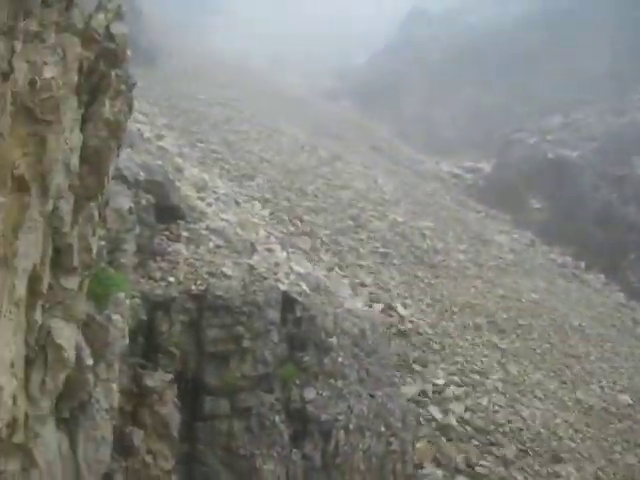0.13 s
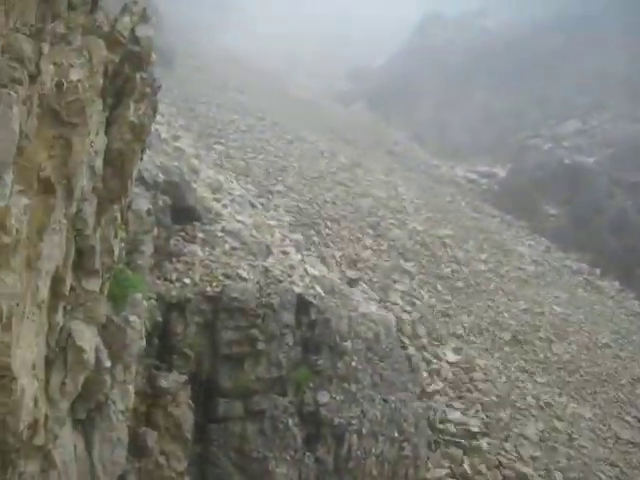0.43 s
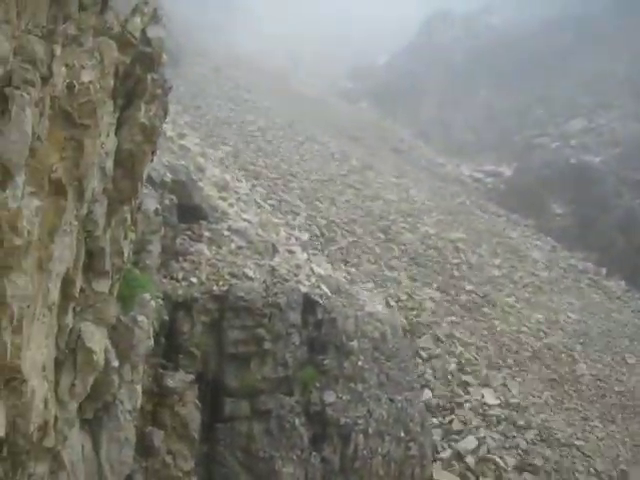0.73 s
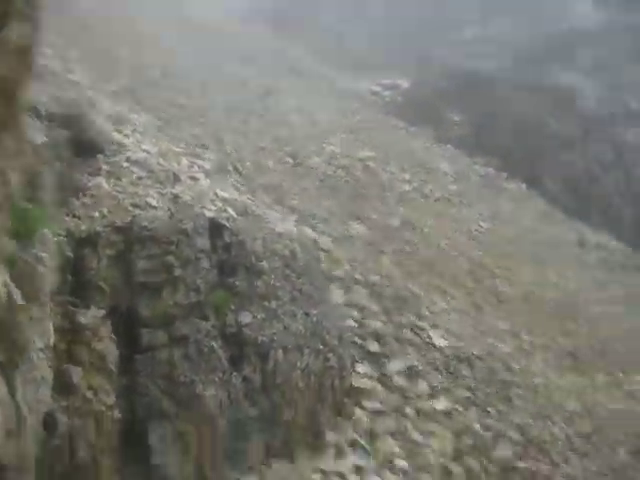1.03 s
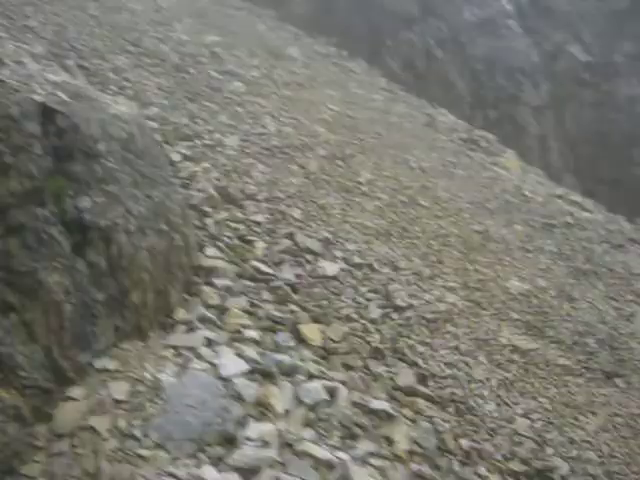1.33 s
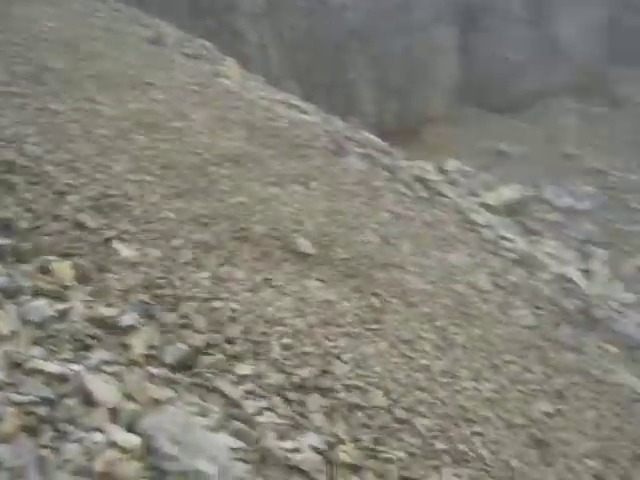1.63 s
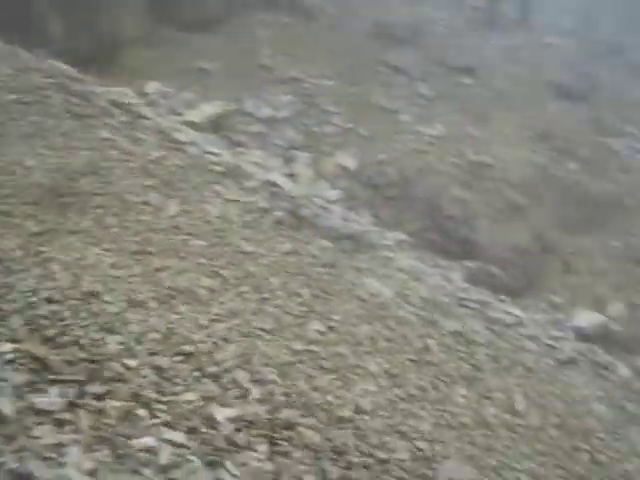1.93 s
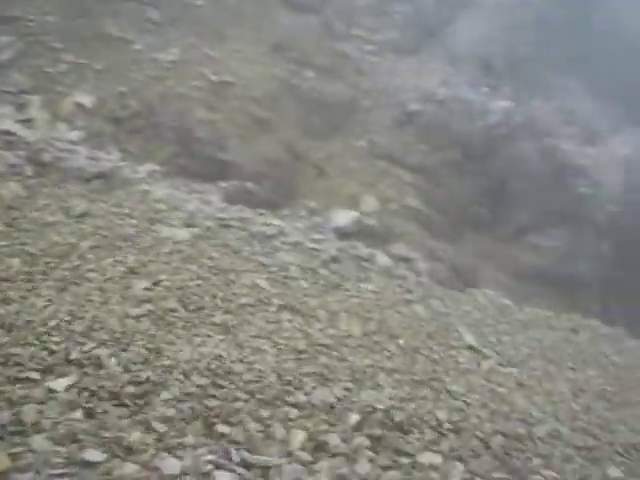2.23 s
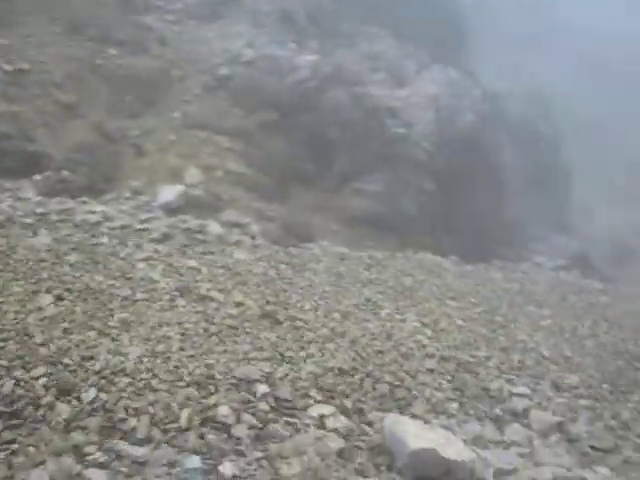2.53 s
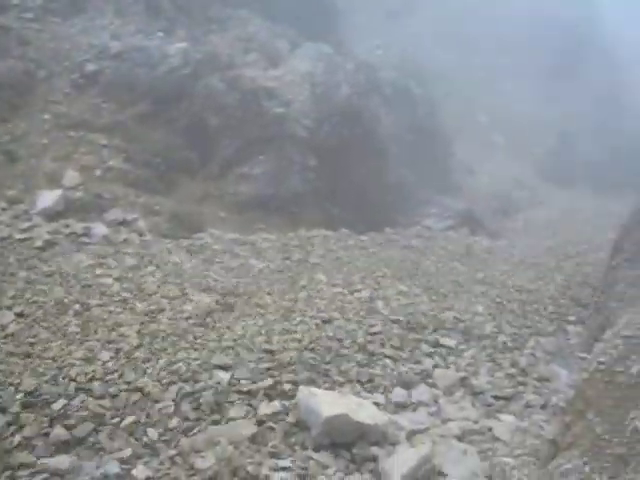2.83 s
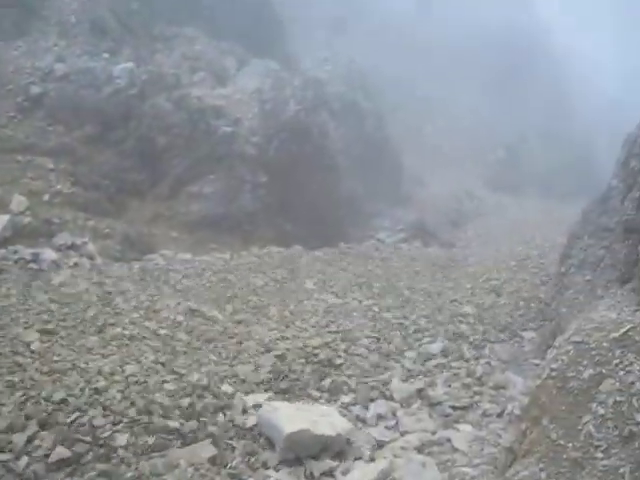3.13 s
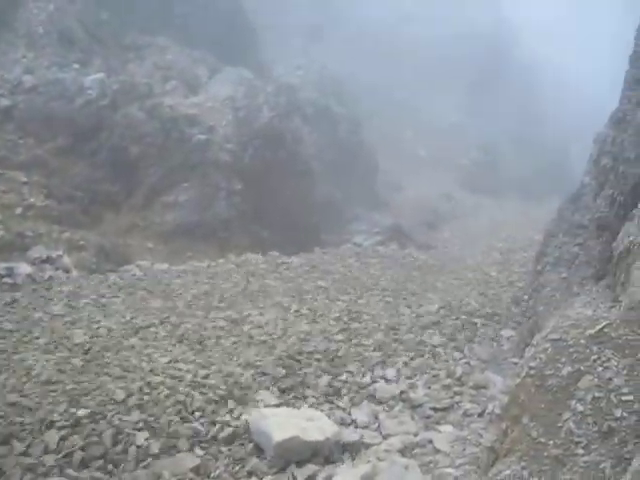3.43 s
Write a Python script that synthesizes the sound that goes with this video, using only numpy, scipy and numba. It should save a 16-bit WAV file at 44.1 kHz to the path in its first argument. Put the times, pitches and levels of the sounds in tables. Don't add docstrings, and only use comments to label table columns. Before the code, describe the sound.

Loose stones stream down a steep rock gully in a dense, dry, hissing rattle.

```python
import sys
import numpy as np
from scipy import signal
from scipy.fft import rfft, irfft
from scipy.io import wavfile
from scipy.ndimage import uniform_filter1d
from numba import njit

SR = 44100
rng = np.random.default_rng(int(sys.argv[2]) if len(sys.argv) > 2 else 0)


def materialize(psi):
    bounded = np.clip(np.atleast_2d(psi).T, -1, 1)
    quanta = np.round(bounded * 32767).astype(np.int16)
    wavfile.write(sys.argv[1], SR, quanta)


def amplitude_ratio(level_db):
    exponent = np.asarray(level_db, float) / 20
    return 10 ** exponent


N = 157437


def read(table, hz):
    table = np.array(table)
    return np.interp(np.log(hz), np.log(table[:, 0]), table[:, 1])


def unit(x):
    return x / np.sqrt(np.mean(x ** 2))


def walk(rate):
    hold = int(SR / rate)
    steps = np.repeat(rng.standard_normal(N // hold + 1), hold)
    slewed = uniform_filter1d(uniform_filter1d(steps, hold), hold)[:N]
    return unit(slewed - uniform_filter1d(slewed, size=SR // 3))


def band(x, lo_hz, hi_hz):
    hz = np.arange(N // 2 + 1) * SR / N
    inside_hz = np.minimum(hz - lo_hz, hi_hz - hz)
    return irfft(rfft(x) * np.clip(inside_hz / 40 + 1, 0, 1), N)


@njit
def rings(length, start, hz, cycles, size):
    out = np.zeros(length)
    for k in range(len(start)):
        turn = np.exp((2j * np.pi - np.log(1000) / cycles[k]) * hz[k] / SR)
        z = size[k] + 0j
        for i in range(start[k], min(length, start[k] + int(cycles[k] * SR / hz[k]))):
            out[i] += z.imag
            z *= turn
    return out


def struck(hits):
    s, db, hz, cycles = np.array(hits, float).T
    return -rings(N, (s * SR).astype(np.int64), hz, cycles, amplitude_ratio(db))


def stream(tilt_db):
    # [f/Hz, level/dB]
    stone_levels = [(330, -22.5), (500, -17.5), (1000, -14), (1600, -11), (2300, -2.5), (3500, -0.75),
                    (4800, 2.15), (6200, -4.5)]
    knocks_per_s, knock_cycles, knock_spread_db = 65000, 12, 1.5
    surges_per_s, surge_db = 36, .4
    patches_per_s, patch_db = 26, .65
    where, pitch, loudness, damping, sign = rng.random((int(knocks_per_s * N / SR), 5)).T
    at = (where * N).astype(np.int64)
    hz = 300 * 22 ** pitch
    patches = np.array([walk(patches_per_s) for _ in range(9)])
    group = (pitch * len(patches)).astype(int)
    db = read(stone_levels, hz) - knock_spread_db * np.log(loudness + 1e-9) + 10 * np.log10(hz)
    db = db + surge_db * walk(surges_per_s)[at] + patch_db * patches[group, at]
    db = db - tilt_db[at] * np.log2(hz / 3000)
    knocks = rings(N, at, hz, knock_cycles * (.5 + damping), amplitude_ratio(db) * np.sign(sign - .5))
    knocks = signal.lfilter(*signal.butter(1, 915, "high", fs=SR), knocks)
    return unit(signal.sosfilt(signal.butter(4, 338, "high", fs=SR, output="sos"), knocks))


def clacks():
    # [t/s, peak level/dB, f/Hz, ring/cycles]
    near_stones = [
        (.65, -22, 3500, 12),
        (.713, -21, 4300, 14),
        (.857, -20, 3500, 9),
        (1.34, -22, 4000, 12),
        (1.815, -23, 3200, 14),
        (1.835, -20, 4500, 9),
        (2.58, -22, 3500, 12),
        (3.155, -21, 2500, 12),
        (3.465, -18, 2600, 10),
    ]
    return struck(near_stones)


def thuds():
    # [t/s, peak level/dB, f/Hz, ring/cycles]
    cobbles = [(.69, -48, 220, 6), (1.512, -35.5, 130, 7), (1.6, -46, 60, 4), (1.668, -43, 130, 22),
               (1.712, -44, 170, 12), (1.912, -41.5, 145, 14), (2.196, -47, 200, 6), (3.088, -43, 170, 12),
               (3.222, -46, 50, 5), (3.453, -43, 75, 5), (3.538, -44, 130, 12)]
    return struck(cobbles)


def rumble():
    # [f/Hz, level/dB]
    ground = [(20, -15), (40, -5), (60, -4), (130, -0.9), (200, -1), (300, -4.5), (450, -14), (900, -26.5)]
    flicker_db, flickers_per_s = 1.3, 14
    hz = np.maximum(np.arange(N // 2 + 1) * SR / N, 1)
    spectrum = rfft(rng.standard_normal(N)) * amplitude_ratio(read(ground, hz)) * (hz < 3000)
    return unit(irfft(spectrum, N)) * amplitude_ratio(flicker_db * walk(flickers_per_s))


def scene():
    # [t/s, level/dB, share of larger stones/dB per octave, ground rumble/dB]
    course = np.array([(0, -26.5, -1.1, 2.5), (.2, -27.5, -0.2, -4), (.4, -27.5, -3.8, -1),
                       (.6, -27.5, -2, 0), (.8, -27.5, -1.5, 0), (1.021, -27, -6.5, 0),
                       (1.2, -27, -5, -2.5), (1.311, -26.5, -1.1, -4), (1.471, -27, -2.7, 1.2),
                       (1.62, -28, -7.6, -3), (1.749, -27, -6, 0), (1.95, -27.5, -1.7, 0),
                       (2.201, -27, -1, -0.5), (2.5, -27, -0.1, 0.3), (2.78, -26.5, 0.1, -0.5),
                       (3.1, -26, -0.15, 0.5), (3.35, -27, 0.1, 1), (3.57, -27.3, -1.5, -0.5)]).T
    t = np.arange(N) / SR
    level_db, tilt_db, ground_db = (np.interp(t, course[0], column) for column in course[1:])
    stones = stream(np.clip(tilt_db, -2, 3)) * amplitude_ratio(level_db) + clacks()
    mono = stones + thuds() + rumble() * amplitude_ratio(-52 + np.clip(ground_db, -7, 3))
    return np.array([mono, mono])


def gain_control(x):
    # [t/s, depth/dB]
    dips = [
        (0.369, 2.2),
        (.5, 3),
        (.74, 2),
        (.92, 6),
        (1.041, 2.5),
        (1.144, 6.5),
        (1.38, 2),
        (2.588, 1),
        (2.841, 3),
        (3.267, 5.5),
    ]
    attack_s, release_s = .005, .04
    t = np.arange(N) / SR
    duck_db = np.zeros(N)
    for s, depth_db in dips:
        onset = np.clip((t - s) / attack_s, 0, 1)
        duck_db += depth_db * onset * np.exp(-np.maximum(t - s, 0) / release_s)
    return x * amplitude_ratio(-duck_db)


def wide_hiss():
    # [t/s, low f/Hz, high f/Hz, level/dB]
    bursts = [
        (.39, 5150, 6160, -42),
        (0.436, 4500, 5700, -37),
        (0.763, 4520, 5400, -38),
        (.832, 4400, 5600, -56),
        (1.065, 4130, 5750, -34.5),
        (3.432, 4000, 5230, -46),
    ]
    half_width_s = 0.027
    t = np.arange(N) / SR
    hiss = rng.standard_normal(N)
    fill = np.zeros(N)
    for s, lo_hz, hi_hz, db in bursts:
        swell = np.cos(np.clip((t - s) / half_width_s, -1, 1) * np.pi / 2) ** 2
        fill += amplitude_ratio(db) * unit(band(hiss, lo_hz, hi_hz)) * swell
    return fill * np.array([[1], [-1]])


def band_limit(x):
    return signal.sosfilt(signal.butter(12, 15800, fs=SR, output="sos"), x)


def record(dry):
    tick = [-.25, 1.1, 1.1, -.25]
    tick_s, tick_db = 1.42329, -19.5
    edge = signal.cheby2(10, 48, 6430, fs=SR, output="sos")
    x = band(signal.sosfilt(edge, gain_control(dry)), 0, 6290)
    x = x + wide_hiss() - .0033
    at = int(tick_s * SR)
    x[:, at - 2:at + 2] -= amplitude_ratio(tick_db) * np.array(tick)
    return band_limit(x)


dry = scene()
out = record(dry)
materialize(out)
```